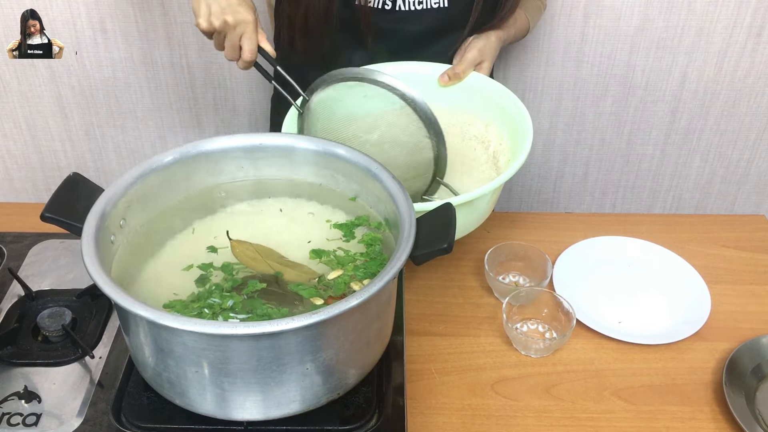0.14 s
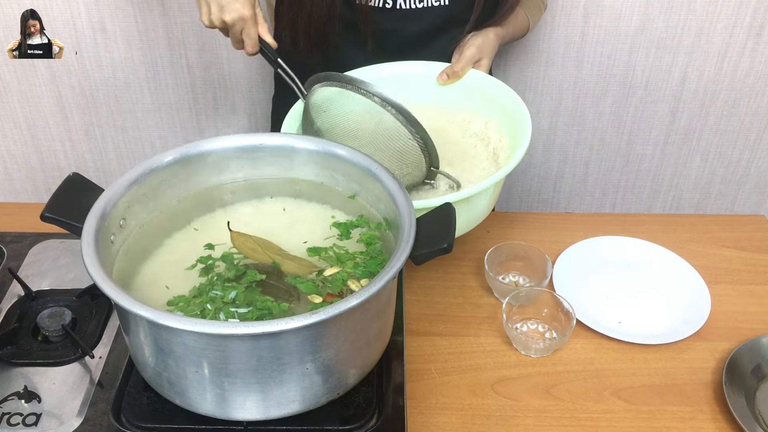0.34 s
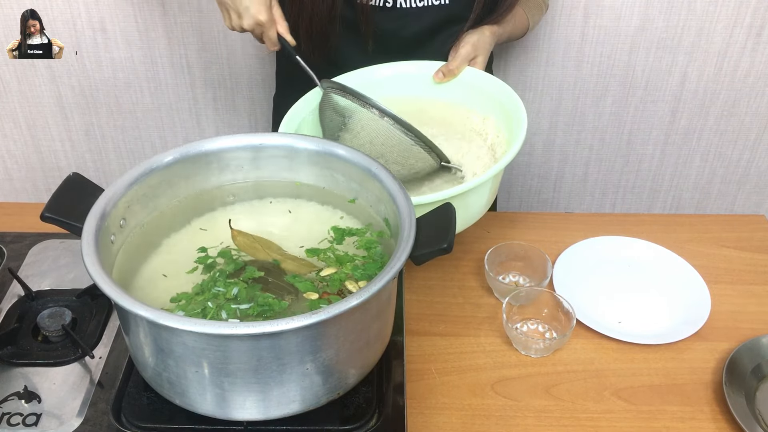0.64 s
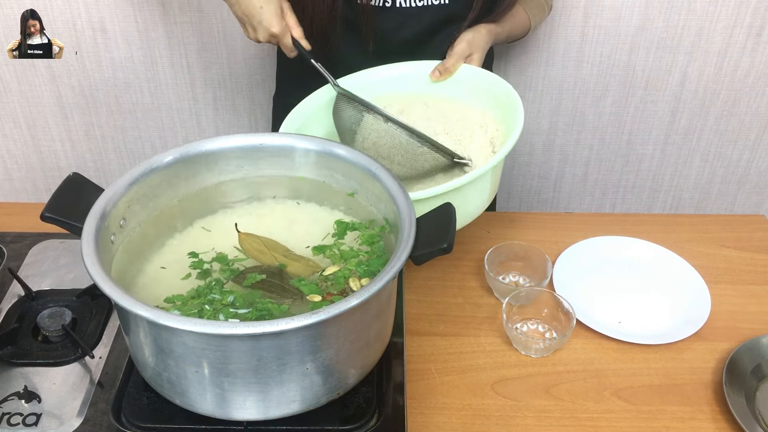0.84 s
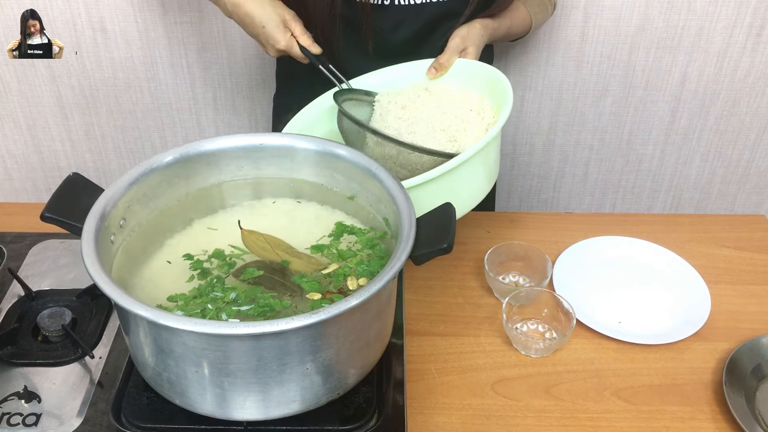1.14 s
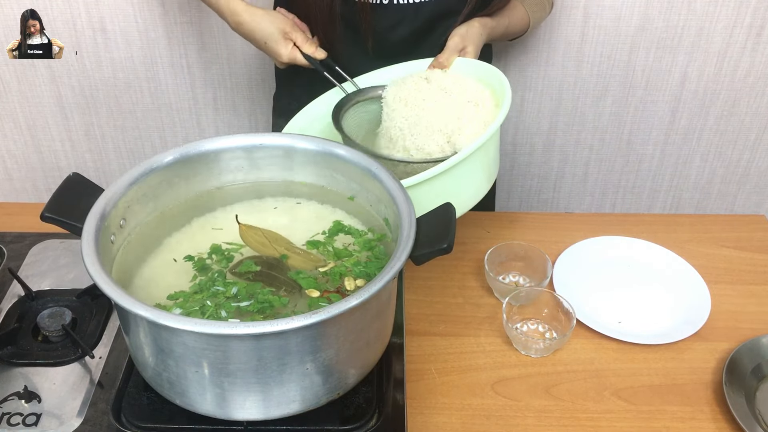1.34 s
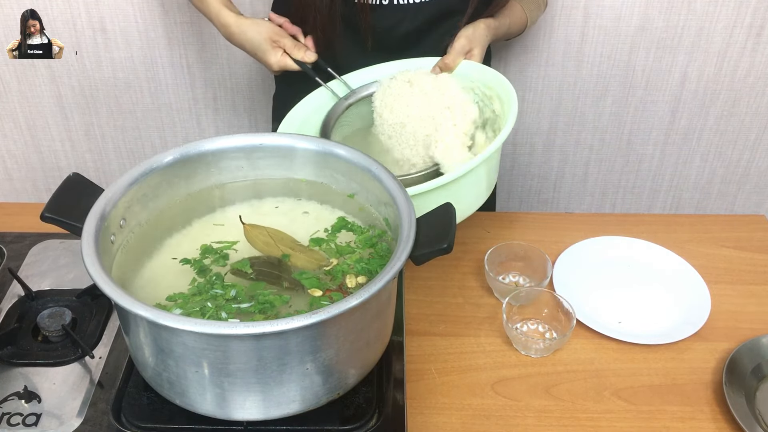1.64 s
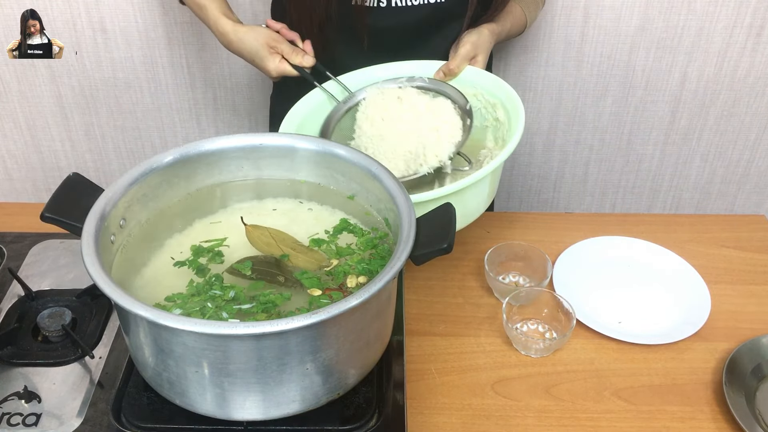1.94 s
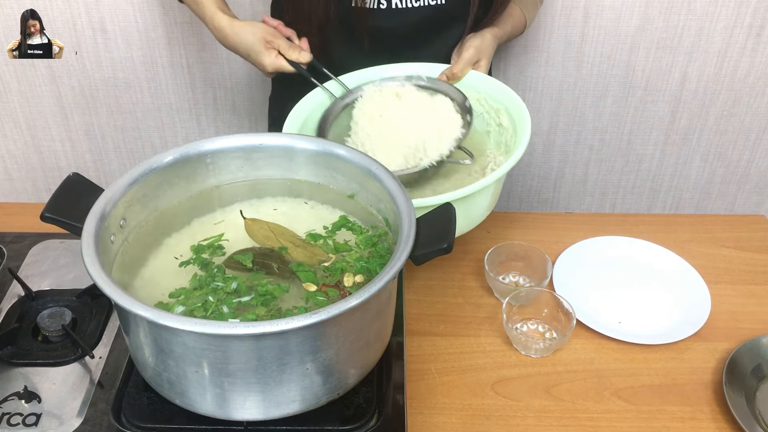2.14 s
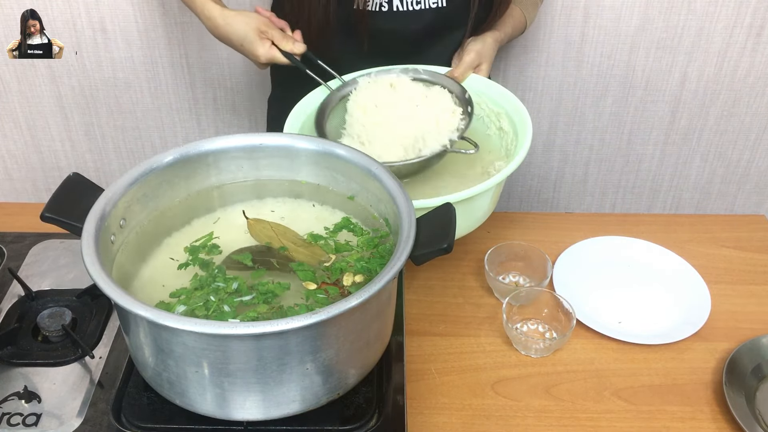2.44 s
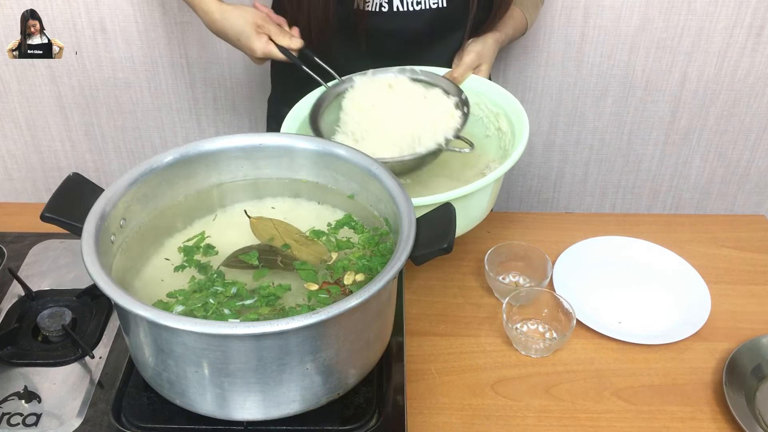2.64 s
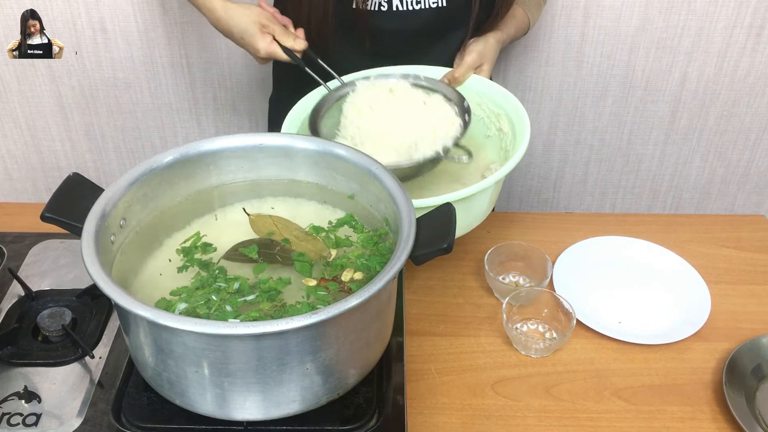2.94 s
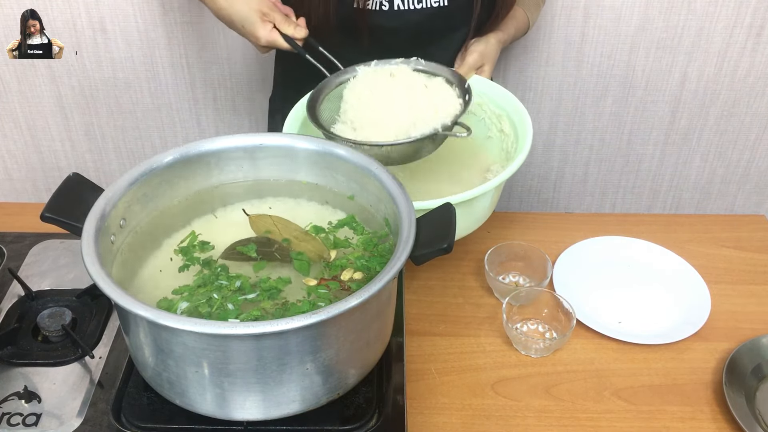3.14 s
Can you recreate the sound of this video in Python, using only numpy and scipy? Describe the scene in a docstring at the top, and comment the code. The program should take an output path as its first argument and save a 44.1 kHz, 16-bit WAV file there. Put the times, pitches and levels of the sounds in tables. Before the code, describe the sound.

In a small tiled kitchen with a quiet low hum and burner hiss, a wire strainer drags softly through soaked rice in a plastic basin, clicking and knocking it once. Water drips with short plops. After a near-quiet pause, a bright gritty hiss swells, then five very loud hard metal raps come close by, each with small bounces and a short bright room echo. Close microphone, nearly mono.

```python
"""Rice and raps in a kitchen

A strainer digs through wet rice in a plastic basin, knocks it and drips, while a burner hisses behind.
Then a gritty hiss swells and something small and hard is rapped five times close by; the tiled room answers.
Shaped noise makes the hiss and the rice, rising tones make the drops, and ringing modes make knocks and raps.
The two channels are almost alike."""
import sys
import numpy as np
from scipy import signal
from scipy.fft import rfft, irfft, next_fast_len
from scipy.io import wavfile
from scipy.ndimage import map_coordinates

SR = 44100
rng = np.random.default_rng(int(sys.argv[2]) if len(sys.argv) > 2 else 0)


def inscribe(sig):
    """Save sig as 16-bit PCM at rate SR to the path in sys.argv[1].

    A 1-D sig is mono; a 2-D sig holds one channel per row.
    Samples are clipped to [-1, 1] before scaling.
    """
    pcm = np.round(np.clip(np.atleast_2d(sig).T, -1, 1) * 32767)
    wavfile.write(sys.argv[1], SR, pcm.astype(np.int16))


N = 293697  # length in samples


def amp(db):
    """Turns decibels into a gain."""
    return 10 ** (np.asarray(db) / 20)


def unit(x):
    """Scales a sound to an average (rms) strength of 1."""
    return x / np.sqrt(np.mean(x ** 2) + 1e-20)


def along(points, hz):
    """Reads a curve of (frequency, value) points, spaced by pitch as the ear hears it."""
    f, v = np.transpose(points)
    return np.interp(np.log(hz + 1), np.log(f + 1), v)


def curves(rows):
    """Draws one dB value per sample for each level column; -120 dB outside the table."""
    s, *columns = np.transpose(rows)
    time = np.arange(N) / SR
    return [np.interp(time, s, c, left=-120, right=-120) for c in columns]


def filtered(x, response):
    """Colours a sound by multiplying its spectrum by a response to frequency."""
    size = next_fast_len(x.shape[-1] + 8192)  # spare room lets the ringing run out
    hz = np.fft.rfftfreq(size, 1 / SR)
    return irfft(rfft(x, size) * response(hz), size)[..., :x.shape[-1]]


def modes(table):
    """Sums resonances with alternating sign; a narrow one rings longer than a wide one."""
    def response(f):
        total = 0
        for k, (centre, width, db) in enumerate(table):
            drag = 1j * f * width
            total = total + (-1) ** k * amp(db) * drag / (centre * centre - f * f + drag)
        return total
    return response


def add(out, s, sound):
    """Mixes a sound in at time s, in seconds."""
    part = out[max(round(s * SR), 0):][:len(sound)]
    part += sound[:len(part)]


def crackle(per_s, spread_db, smooth):
    """Makes noise of rms 1 from a smooth part plus sparse sharp grains of varied size."""
    draw = rng.random((2, N))
    size = amp(-spread_db * np.log(draw[1] + .05))
    grains = (draw[0] < per_s / SR) * size
    life = np.exp(-np.arange(64) / 12)  # each grain is a tiny noise burst
    swell = smooth + np.convolve(grains, life)[:N]
    return unit(swell * rng.standard_normal(N))


def stroke(s, db, rise, hold):
    """Makes a gain that climbs its last 12 dB over the rise, peaks near s, then dies at a steady rate."""
    fall_db_per_s = 185
    t = np.arange(N) / SR - s
    return amp(db + np.minimum(12 * t / rise, 0) - fall_db_per_s * np.maximum(t - hold, 0))


def swing(table, weight):
    """Modes fed through water or wood build up slowly, then die; the higher ones waver more."""
    t = np.arange(SR // 3) / SR
    total = np.zeros(len(t))
    for hz, db, rise in table:
        wander = np.cumsum(rng.standard_normal(len(t))) * hz / 6000
        phase = 2 * np.pi * hz * t + wander + rng.uniform(0, 2 * np.pi)
        growth = (t / rise * np.exp(1 - t / rise)) ** 1.58
        total += weight(hz) * amp(db) * growth * np.sin(phase)
    return total


# How long the tiled room rings: (frequency [Hz], time to fade by 60 dB [s])
TILE_FADES = [(200, 0.44), (530, 0.48), (1390, 0.28), (3680, 0.4), (6000, 0.37), (9700, 0.38),
              (15000, 0.35)]


def tail(seconds):
    """Makes a fresh room answer of energy 1 from noise; each frequency dies at its own speed."""
    hz, t, z = signal.stft(rng.standard_normal(round(seconds * SR)), SR, nperseg=256)
    fade = amp(-60 * t / along(TILE_FADES, hz)[:, None])
    wash = signal.istft(z * fade, SR, nperseg=256)[1]
    wash *= 1 - np.exp(-np.arange(len(wash)) / (0.0013 * SR))  # the walls take a moment to reply
    return wash / np.linalg.norm(wash)


# Background level over time: (time [s], low drone level [dB], change of burner hiss [dB])
KITCHEN_LEVELS = [(0.0, -41, 1.5), (0.41, -43.5, 3), (6.38, -43, 0), (6.66, -45.5, 0)]
# Low resonances of the room: (frequency [Hz], width [Hz], level before scaling [dB])
ROOM_DRONE = [(47.6, 10.5, 0.5), (100, 7.2, 3.5), (134.8, 11.3, 2.5), (198.2, 10.85, 3.5),
              (279.6, 44.4, -8.5), (363, 51, -15.5), (468, 23, -17.5), (677.5, 71, -15)]
# Colour of the burner hiss before its bass cut: (frequency [Hz], relative level [dB])
HISS_COLOUR = [(18, -42), (30, -3), (134, 15.5), (280, -18), (345, -30), (374, -11), (415, -16), (499, -30),
               (889, -21.5), (1250, -21.5), (1910, -25.5), (2060, -25), (2680, -31), (4800, -37.5),
               (6000, -38), (9000, -37.5), (10500, -47.5), (12500, -39), (16000, -47)]
# Narrow hiss of the gas jets: (frequency [Hz], width [Hz], level before the slow change [dB])
GAS_JETS = (7400, 280, -70)


def kitchen():
    """Appliances stir the room's resonances; the burner hisses with a little simmering crackle."""
    def drone_colour(hz):
        return modes(ROOM_DRONE)(hz) * hz ** 4 / (hz ** 4 + 38 ** 4)  # cut the deepest rumble

    def hiss_colour(hz):
        return amp(along(HISS_COLOUR, hz)) * hz ** 2 / (hz ** 2 + 400 ** 2)

    drone_db, hiss_db = curves(KITCHEN_LEVELS)
    drone = amp(drone_db) * unit(filtered(rng.standard_normal(N), drone_colour))
    hiss = amp(-52.5) * unit(filtered(rng.standard_normal(N), hiss_colour))
    jet_hz, jet_width, jet_db = GAS_JETS
    jets = amp(jet_db) * unit(filtered(rng.standard_normal(N), modes([(jet_hz, jet_width, 0)])))
    simmer = amp(-68.0) * unit(filtered(crackle(60, 1.3, 0.084), modes([(12000, 10000, 0)])))
    return drone + amp(hiss_db) * (hiss + jets + simmer)


# Strokes through wet rice: (time [s], level [dB], rise [s], hold [s])
RICE_STROKES = [(0.08, -44.5, .12, 0), (0.205, -51, 0.054, 0.12), (0.455, -42.5, 0.049, 0),
                (0.676, -49.5, 0.091, 0.035), (1.0, -52.5, 0.11, 0.0099), (1.329, -48, 0.17, 0.052),
                (1.66, -53, 0.17, 0.045), (1.804, -47.5, 0.017, 0.04), (1.91, -39, 0.0066, 0),
                (2.157, -52.5, 0.013, 0.09)]
# Colour of the wet rice: (frequency [Hz], relative level [dB])
RICE_COLOUR = [(180, -6), (300, 1), (433, -12), (478, 2.5), (574, -4.5), (994, -0.5), (3240, -6),
               (11700, -22), (16000, -35)]


def strainer():
    """Wet grains shift and scrape against the mesh: grainy noise follows each stroke."""
    level = sum(stroke(*row) for row in RICE_STROKES)
    grains = crackle(550, 6.2, 0.75)
    return level * unit(filtered(grains, lambda hz: amp(along(RICE_COLOUR, hz))))


# Drops into the basin: (time [s], level [dB], starting pitch [Hz], time to fade by 60 dB [s])
WATER_DROPS = [(0.18, -45, 3760, 0.024), (0.205, -34, 3160, 0.023), (0.203, -33, 1670, 0.015),
               (1.334, -38, 1015, 0.035), (1.716, -40.5, 4040, 0.018), (2.532, -29, 960, 0.014),
               (2.676, -33.5, 965, 0.022), (2.939, -36, 1980, 0.018), (2.998, -47, 5930, 0.03),
               (3.077, -31.5, 554, 0.043), (3.296, -43.5, 5000, 0.013), (3.451, -49, 2830, 0.03),
               (3.563, -42, 2040, 0.03), (3.59, -37.5, 1240, 0.097), (3.913, -37.5, 1714, 0.084),
               (3.93, -46, 4350, 0.03), (3.945, -34.5, 2660, 0.023), (3.958, -39.5, 5100, 0.028),
               (3.959, -34, 2680, 0.013), (3.975, -48, 5000, 0.02), (3.989, -40, 5400, 0.026),
               (4.005, -49, 5300, 0.02), (4.026, -45, 7600, 0.024), (4.05, -46, 5930, 0.02),
               (4.307, -46, 1600, 0.035), (5.295, -31.5, 2150, 0.01), (5.555, -33.5, 1400, 0.015),
               (6.126, -43, 1310, 0.03)]


def drops():
    """Each drop lands with a tiny splash and traps a bubble whose pitch climbs as it rings out."""
    out, t = np.zeros(N), np.arange(SR // 5) / SR
    for s, db, hz, t60 in WATER_DROPS:
        phase = 2 * np.pi * hz * (t + 0.09 * t ** 2 / t60)
        onset = 1 - np.exp(-t / 0.00022)
        bubble = amp(-60 * t / t60) * onset * np.sin(phase)
        spray = amp(-60 * t / 0.044) * rng.standard_normal(len(t))
        splash = filtered(spray, modes([(1.22 * hz, 0.5 * hz, 0)]))
        add(out, s, amp(db) * (bubble + splash))
    return out


# Clicks of wire, rice and bursting films:
# (time [s], peak level [dB], centre before tilt [Hz], width [octaves])
SMALL_CLICKS = [(0.08, -26, 3280, 1.3), (0.7371, -30.5, 3170, 0.56), (0.9898, -22, 6200, 2.8),
                (1.088, -38, 3000, 0.74), (1.217, -39, 4250, 0.5), (1.3103, -23.5, 8000, 3.6),
                (1.6927, -23, 11600, 0.76), (1.8255, -20, 1860, 2.6), (1.9066, -21, 2670, 3.5),
                (1.9614, -43, 5300, 0.9), (1.9932, -25.5, 1460, 0.59), (2.158, -24.5, 3720, 1.9),
                (2.1854, -32.5, 12100, 0.27), (2.1955, -26, 1340, 0.67), (2.2292, -36, 3800, 1),
                (2.7985, -35.5, 11100, 0.54), (2.888, -32.5, 8250, 0.3), (4.2764, -41, 13800, 0.3),
                (4.31, -37.5, 5900, 1.8), (4.6802, -27, 10900, 1.2), (4.7251, -21, 10600, 1.6),
                (4.9541, -10.5, 5800, 1.55), (5.1371, -21.5, 9300, 0.51), (5.313, -27, 9800, 0.32),
                (5.5784, -32, 10500, 0.53)]


def ticks():
    """A sharp contact sits in a few milliseconds of noise, heard around each click's centre."""
    out, t = np.zeros(N), np.arange(512) / SR
    lead = 32  # samples of noise before the contact
    for s, db, hz, octaves in SMALL_CLICKS:
        def colour(f):
            bell = np.exp(-(np.log2((f + 1) / hz) / octaves) ** 2)
            return bell * (hz / (f + 300)) ** 0.66  # tilted towards the low side

        burst = .2 * amp(-60 * t / .008) * rng.standard_normal(len(t))
        burst[lead] = 1
        click = filtered(burst, colour)
        add(out, s - lead / SR, amp(db) * click / np.abs(click).max())
    return out


# Knocks on the basin: (time [s], level [dB], centre [Hz])
BASIN_KNOCKS = [(0.062, -32, 263), (1.822, -49, 1110), (1.904, -27, 1100), (1.908, -20.5, 233),
                (1.99, -44.5, 1010), (2.19, -39, 294), (4.954, -36, 368)]
# How the basin rings: (frequency [Hz], relative level [dB], time to full swing [s])
BASIN_MODES = [(123, 15, 0.012), (187.6, -1.5, 0.039), (269.3, 1, 0.02), (362, -3, 0.027), (469, 0, 0.014),
               (651.6, 11.5, 0.023), (851, 1, 0.012), (1180, -1.5, 0.0039), (1475, -2.5, 0.032),
               (2320, 2, 0.0087)]


def thuds():
    """Each knock drives the basin's modes, most of all those near its own centre."""
    out = np.zeros(N)
    for s, db, centre in BASIN_KNOCKS:
        knock = swing(BASIN_MODES, lambda hz: 1 / (1 + (np.log2(hz / centre) / 0.34) ** 2))
        add(out, s, amp(db) * knock)
    return out


# The long gritty hiss: (time [s], level [dB])
GRIT_LEVELS = [(4.47, -72), (4.6, -59), (4.832, -64), (4.845, -48), (4.96, -48), (5.15, -41.5), (5.27, -45),
               (5.39, -51), (5.44, -63), (5.6, -58.5)]
# A faint slow swell added to it; a negative hold starts the fall early:
# (time [s], level before the early fall [dB], rise [s], hold [s])
GRIT_SWELL = (5, -60.5, 1.2, -0.05)
# Colour of the grit: (frequency [Hz], relative level [dB])
GRIT_COLOUR = [(710, -14), (1200, -6), (1520, -6), (2200, 0.5), (2950, -3), (3740, 5), (4360, 4.5),
               (4860, -0.5), (5470, 2.5), (7660, -2), (9310, 1), (13600, -7), (16000, -5.5)]


def grit():
    """Smooth noise and sharp grains are shaped into a bright hiss that swells and fades."""
    level = amp(curves(GRIT_LEVELS)[0]) + stroke(*GRIT_SWELL)
    grains = crackle(250, 4.5, 1)
    return level * unit(filtered(grains, lambda hz: amp(along(GRIT_COLOUR, hz))))


# Raps and their bounces: (time [s], peak level before room and channel balance [dB])
RAP_HITS = [(5.6087, -1.5), (5.6167, -9.5), (5.6487, -15.5), (5.8036, -0.5), (5.811, -15), (5.9777, -2.5),
            (6.0159, -10), (6.1813, -0.5), (6.2364, -11.5), (6.3989, 0.5)]
# The rapped metal; its thin modes ring on: (frequency [Hz], width [Hz], relative level [dB])
METAL_MODES = [(1486, 140, -7), (2280, 330, -6.5), (3090, 310, 1.5), (4020, 330, 3.5), (4860, 670, 1.5),
               (5720, 670, -1), (7120, 710, -7.5), (8670, 430, -5.5), (10340, 770, -8.5),
               (12100, 1000, -6.5), (15400, 2400, -10), (2870, 11, 3.5), (3170, 7.4, -3), (3275, 8, 0),
               (3290, 7.9, 10), (3600, 9.2, 2), (4250, 9, 4), (4480, 9.2, 3), (5370, 7.8, 6)]
# One rap is a fast chatter of contacts: (delay before jitter [s], level before jitter [dB])
RAP_CONTACTS = [(0, -6.5), (.00035, -9.5), (.001, -2.5), (.002, -0.5), (.003, -29)]
# Colour of what the walls return: (frequency [Hz], relative level [dB])
WALL_COLOUR = [(200, -7.5), (400, -15), (700, -25), (1230, -23), (1710, -12.5), (1970, -10), (2730, -8.5),
               (3050, -5.5), (3300, 1.5), (3700, -8.5), (4150, -2.5), (5400, -4), (7500, -11), (10500, -18),
               (13700, -19.5), (16000, -25)]
# How the worktop booms: (frequency [Hz], relative level [dB], time to full swing [s])
WORKTOP_MODES = [(100.2, -3, 0.064), (138.5, 2, 0.032), (286.7, -0.5, 0.04), (549, -14, 0.026)]


def raps():
    """Chattering contacts ring the metal; the walls return a lumpy wash; the worktop booms late and low."""
    boom_db, wash_db = -38, 8.5  # worktop and walls, added to each rap's level
    off_axis_db, stray_db = -28, -4  # the two left-right differences, added likewise
    mid, side, t = np.zeros(N), np.zeros(N), np.arange(SR // 3) / SR
    same_walls = tail(.5)
    for s, db in RAP_HITS:
        chatter = .12 * amp(-60 * t / .014) * rng.standard_normal((2, len(t)))
        stray = filtered(chatter[1], lambda hz: hz / (hz + 3000))
        for late, contact_db in RAP_CONTACTS:
            jitter_s = abs(rng.normal(0, .00004))
            chatter[0, round((late + jitter_s) * SR)] += amp(contact_db + rng.normal(0, 1.2))
        blow = filtered(chatter[0], modes(METAL_MODES))
        blow = blow / np.abs(blow).max()
        add(mid, s, amp(db) * blow)
        add(side, s, amp(db + off_axis_db) * blow * rng.normal() + amp(db + stray_db) * stray)

        walls = .7 * same_walls + .7 * tail(.5)  # the spot struck shifts, so part of the answer is new
        steps = np.arange(len(walls)) * 150 / SR
        lumps = amp(1.6 * map_coordinates(rng.standard_normal(100), [steps]))  # single echoes stand out
        wash = filtered(lumps * walls, lambda hz: amp(along(WALL_COLOUR, hz)))
        add(mid, s, amp(db + wash_db) * wash / np.linalg.norm(wash))
        add(mid, s, amp(db + boom_db) * swing(WORKTOP_MODES, lambda hz: 1))
    return np.array([mid + side, mid - side]) * amp([[.25], [-.25]])  # first channel a touch louder


def scene():
    """Small sounds share one room answer; the drops fall inside the hollow basin and sound wetter."""
    background = kitchen()
    near = strainer() + ticks() + thuds() + grit()
    water = drops()
    wet = signal.fftconvolve(amp(-9.0) * near + amp(-3) * water, tail(.5))[:N]
    return raps() + near + water + wet + background


def record(dry):
    """Squeezes the loudest peaks and lets little through above about 16 kHz."""
    squeezed = dry / (1 + np.abs(dry) ** 8) ** (1 / 8)
    edge_hz, edge_db = [15600, 16000, 16600, 16800], [0, -22, -26, -70]
    return filtered(squeezed, lambda hz: amp(np.interp(hz, edge_hz, edge_db)))


dry = scene()
out = record(dry)
inscribe(out)
```